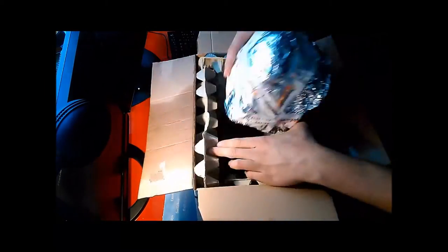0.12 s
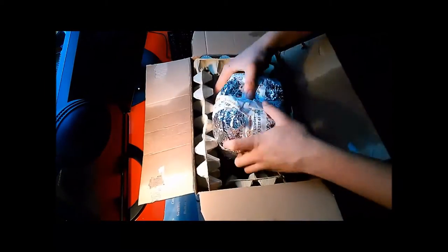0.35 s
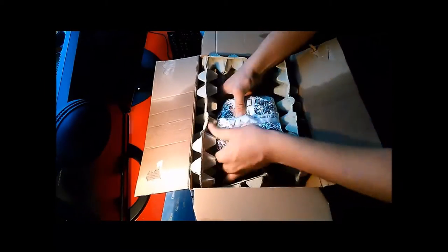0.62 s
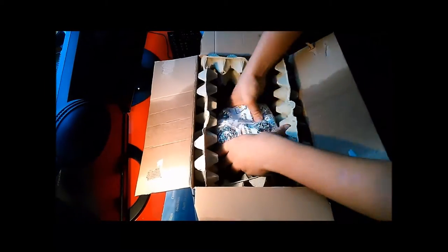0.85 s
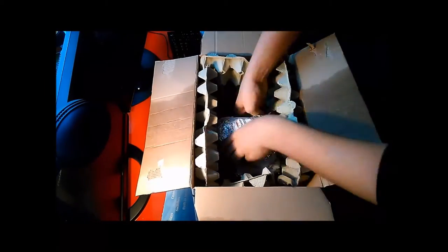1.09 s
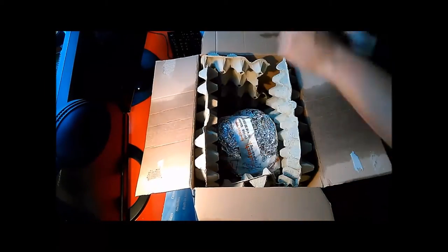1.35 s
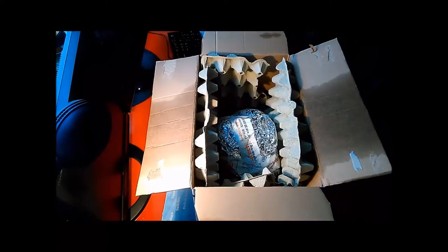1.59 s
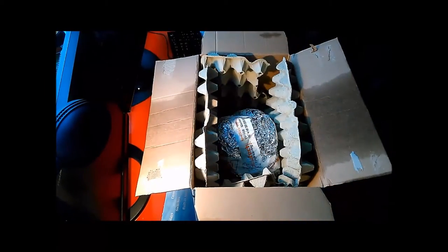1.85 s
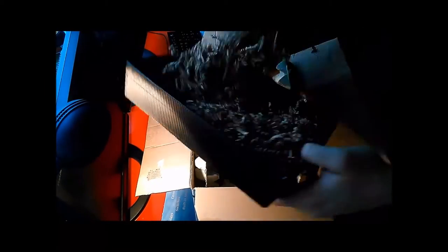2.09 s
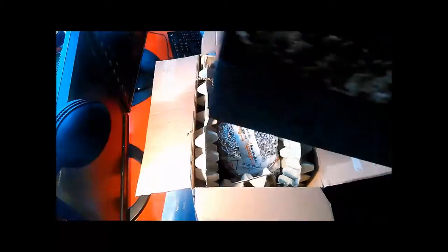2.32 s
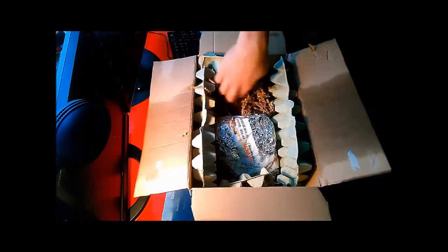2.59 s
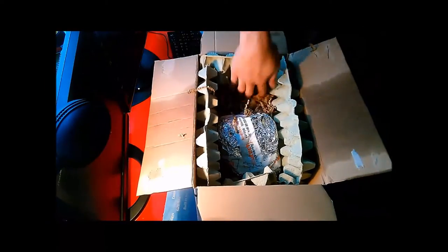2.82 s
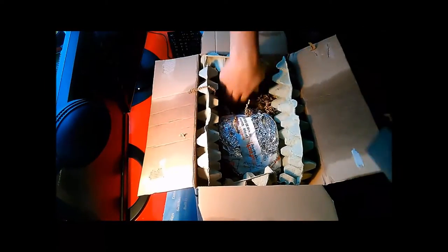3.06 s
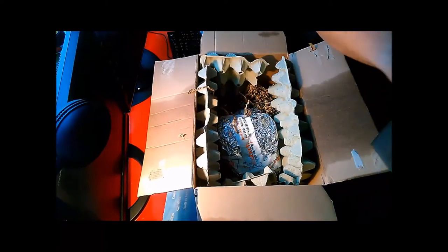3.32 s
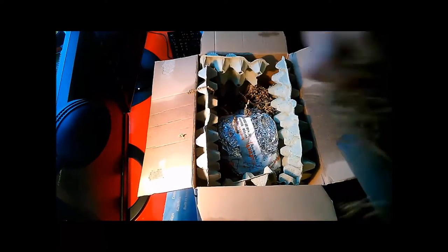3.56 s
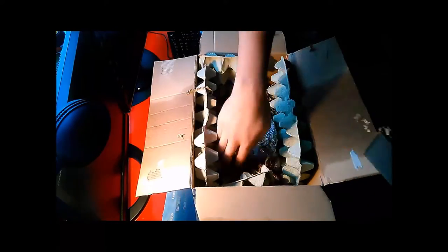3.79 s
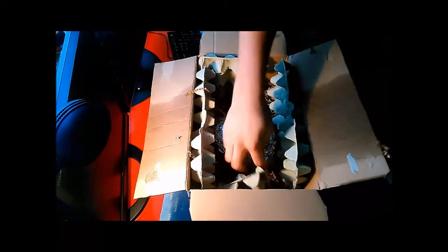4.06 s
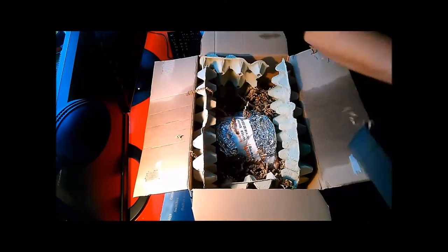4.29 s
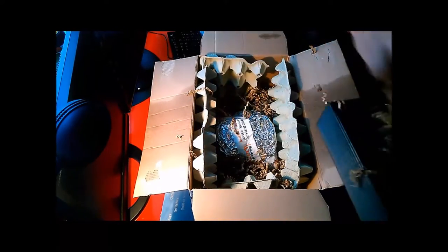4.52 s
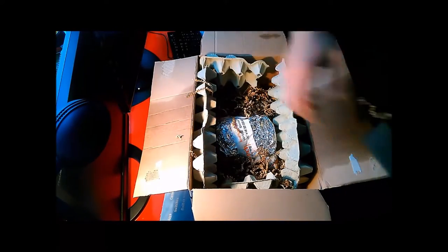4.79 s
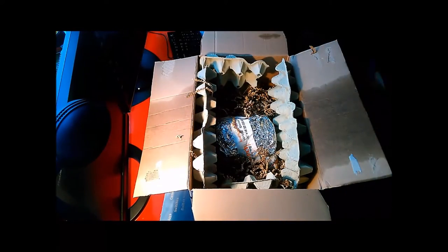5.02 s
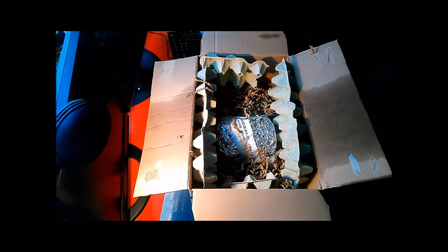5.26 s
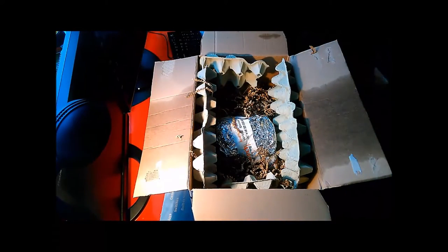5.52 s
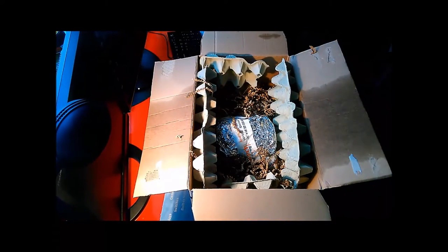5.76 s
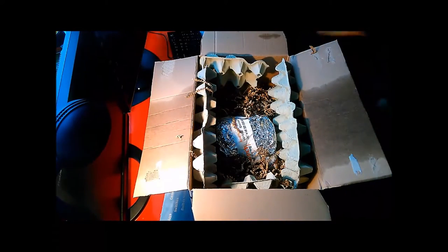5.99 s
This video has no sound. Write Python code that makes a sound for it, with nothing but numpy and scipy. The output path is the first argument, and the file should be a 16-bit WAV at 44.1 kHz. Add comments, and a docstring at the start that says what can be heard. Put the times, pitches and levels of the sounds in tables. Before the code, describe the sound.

Foil-wrapped bundle pressed hard into a cardboard box with crackles, knocks and hollow booms, then softer shredded-paper stuffing and a bright final crumple.

```python
"""Hands press a foil-wrapped bundle into a cardboard box lined with egg trays, in a quiet room.
A tray of shredded paper then slides close, the shreds are stuffed in with short strokes, and at the
end a bright sheet crumples beside the box. Creases are bursts of coloured noise, walls are struck
resonances, and the air in the box booms on low swelling sines. Faint room noise with thin tones
lies below; the right of two close microphones is nearer, so it is louder."""
import sys
import numpy as np
from scipy import signal
from scipy.fft import rfft, irfft
from scipy.io import wavfile
from scipy.ndimage import uniform_filter1d

SR = 44100
rng = np.random.default_rng(int(sys.argv[2]) if len(sys.argv) > 2 else 0)


def store_wav(level_fs):
    """Save 16-bit WAV to argv[1]."""
    pcm = np.round(np.clip(np.atleast_2d(level_fs), -1, 1) * 32767)
    wavfile.write(sys.argv[1], SR, pcm.T.astype(np.int16))


def rack_gain(trim_db):
    """Turn a fader trim in dB into the linear factor to multiply a signal by."""
    fader = np.asarray(trim_db, float)
    return 10 ** (fader / 20)


N = 270333

# Colour of paper crackle. Each row: frequency in Hz, relative level in dB per Hz.
PAPER_COLOUR = [(1200, -18), (2200, -4.5), (3000, -2.5), (4400, -2), (5900, -3.5), (7000, -7.5),
                (8300, -3.5), (10000, 0), (11500, -2), (13500, -2), (15300, -6.5), (16500, -35.5)]


def evened(x):
    """Scales to unit rms."""
    return x / np.sqrt(np.mean(x ** 2) + 1e-20)


def read(points, size):
    """Reads a table over log frequency at the spectrum bins of a signal of this size."""
    hz, value = np.transpose(points)
    bins_hz = np.fft.rfftfreq(size, 1 / SR)
    return np.interp(np.log(bins_hz + 1), np.log(hz + 1), value)


def colour(x, points):
    """Filters by a spectrum table of (Hz, dB)."""
    size = x.shape[-1]
    return irfft(rfft(x) * rack_gain(read(points, size)), size)


def ring(x, modes):
    """Passes x through two-pole resonances (Hz, width Hz, dB) of alternating sign."""
    return sum((-1) ** k * rack_gain(db) * signal.lfilter(*signal.iirpeak(hz, hz / width, SR), x)
               for k, (hz, width, db) in enumerate(modes))


def add(mix, s, sound):
    """Mixes a sound in at a time in seconds."""
    part = mix[:, max(round(s * SR), 0):][:, :sound.shape[-1]]
    part += sound[..., :part.shape[-1]]


def rubbing():
    """One stroke drives paper crackle, its sizzle, the cardboard walls and the air in the box."""
    # Resonances of the cardboard walls. Each row: pitch in Hz, width in Hz, gain in dB.
    wall_modes = [(570, 140, -10), (860, 120, 1.5), (1140, 110, -2), (1370, 150, 0.5), (1605, 130, -0.5),
                  (1980, 430, -6.5), (3120, 190, -6.5)]
    # Resonances of the air in the box. Each row: pitch in Hz, width in Hz, gain in dB.
    air_modes = [(240, 23.4, 8.5), (344, 110, -2.5)]
    fine = creases(per_s=190, spread_db=4.5, fade_s=0.0077, bed=0.95)
    coarse = creases(per_s=120, spread_db=-2.5, fade_s=0.0045, bed=0.52)
    patches = facets(low_hz=668, top_hz=14380, count=18, sharp=7.8)

    paper = colour(0.95 * fine + 0.5 * coarse + 0.72 * patches, PAPER_COLOUR)
    # the thinnest creases speak above this split
    low_pass = signal.butter(N=3, Wn=6770, fs=SR, output="sos")
    crackle = signal.sosfiltfilt(low_pass, paper)
    sizzle = paper - crackle
    walls = ring(coarse + 0.14 * fine + 0.26 * patches, wall_modes)
    # one body of air, the same in both rows
    boom = ring(ring(coarse[0], air_modes), [(258, 700, 0)])
    layers = (crackle, sizzle, walls, boom)
    return sum(level * evened(layer) for level, layer in zip(effort(), layers))


def creases(per_s, spread_db, fade_s, bed):
    """Wide noise that bursts at each crease over a steady bed of rubbing."""
    return evened((bed + gate(per_s, spread_db, fade_s)) * rng.standard_normal((2, N)))


def gate(per_s, spread_db, fade_s):
    """Creases let go at random moments and sizes, each with a sudden start and a short decay."""
    struck = rng.random(N) < per_s / SR
    size = rack_gain(spread_db * np.minimum(rng.exponential(1, N), 3)) * struck
    return evened(signal.lfilter([1], [1, -np.exp(-1 / (fade_s * SR))], size))


def facets(low_hz, top_hz, count, sharp):
    """Flat patches between creases, each flicked at its own moments and ringing at its own pitch."""
    noise = rng.standard_normal((2, N))
    total = 0
    for hz in np.geomspace(low_hz, top_hz, count):
        flicks = gate(per_s=45, spread_db=2.5, fade_s=0.0054) * noise
        width = hz / sharp
        total = total + ring(flicks, [(hz, width, 0)]) / np.sqrt(width)
    return evened(total)


def effort():
    """Levels of crackle, sizzle, wall scrape and boom: the powers of all hand moves add up."""
    # Presses into the box, sudden start and slow sag. Each row: start in seconds, length in seconds,
    # crackle in dB, then sizzle, wall scrape and box boom in dB over crackle.
    press_rows = [(0.128, 0.045, -48, -10, 7, 5.5), (0.196, 0.089, -41, 1, 7.5, 3.5),
                  (0.287, 0.011, -24.5, -8, 0.5, -12), (0.334, 0.15, -35, 0.5, 5, 4.5),
                  (0.45, 0.058, -32, -3.5, 5.5, 7), (0.535, 0.059, -31.5, -2.5, 3.5, -4),
                  (0.616, .021, -41, 1, 12.5, 7), (0.633, 0.059, -27, -4, 7.5, 5),
                  (0.727, 0.069, -35, -1, 6.5, 4), (0.818, 0.13, -33, -2.5, 6.5, 4),
                  (.944, .15, -35.5, -2.5, 6.5, 0), (1.118, 0.04, -29.5, -4.5, 3.5, 4),
                  (1.193, 0.043, -39.5, -7, 4.5, 2.5), (1.396, .02, -39, -18, -6.5, -21),
                  (2.387, 0.048, -42, -2.5, 10.5, 9), (2.453, 0.11, -35, -3.5, 2, -1),
                  (2.596, 0.11, -37.5, 0, 4.5, 0.5), (2.705, 0.1, -35, -3, 1, -3.5),
                  (2.872, 0.075, -33.5, -3, 3, -1.5), (3.019, 0.064, -32.5, -4, -0.5, -5.5),
                  (3.207, 0.061, -42, -1.5, -1.5, -17), (3.77, 0.062, -38, -1, 4.5, -2),
                  (3.85, 0.061, -39, -5.5, 3, 6.5), (3.923, 0.077, -36, -2, 1.5, -1),
                  (4.032, 0.048, -38, -1.5, -1, -5), (4.102, 0.065, -36, -5, 0.5, -0.5),
                  (4.188, 0.029, -39, -2.5, 2.5, -10.5), (4.328, 0.065, -46.5, -2.5, 3, 7.5),
                  (5.002, 0.022, -47, -11, 9.5, -13), (5.042, 0.029, -48, -1, 8, -2)]
    # Loose rustles above the box, swelling and fading evenly. Each row: peak in seconds,
    # half width in seconds, crackle in dB, then sizzle and wall scrape in dB over crackle.
    rustle_rows = [(0.035, 0.018, -46, 12, -13), (.08, 0.014, -52.5, -17, -1), (1.372, 0.029, -62, -3, 2),
                   (1.549, 0.14, -67, -4, -8), (1.761, 0.059, -52.5, 0, -7.5), (3.351, 0.096, -60.5, 4, -7),
                   (3.425, 0.022, -53, 8, -4), (3.5, 0.088, -59, 0, -10), (3.596, 0.02, -50.5, 5.5, -13),
                   (3.693, 0.024, -29, 1, -5), (4.5, 0.13, -60, -2, 3.5), (4.601, 0.069, -54, -4, -12),
                   (4.682, 0.025, -38.5, -1.5, -10), (4.746, 0.024, -43.5, 1, -1),
                   (5.118, 0.03, -55.5, -4, 7), (5.234, 0.061, -49.5, 8.5, 2.5)]
    # The tray of shreds passing. Each row: time in seconds, crackle in dB,
    # then sizzle, wall scrape and box boom in dB over crackle.
    tray_rows = [(1.82, -63, -15, -7, -13), (1.882, -57.5, 3, -6, -28), (2.01, -57.5, 5.5, -12.5, 1),
                 (2.028, -52.5, -2.5, -6, -18), (2.158, -37.5, -1.5, -3.5, -25),
                 (2.182, -34, -4.5, -3, -12.5), (2.35, -42.5, -0.5, 0, -11), (2.38, -54.5, -10, -10, -10)]
    # The sheet crumpling, with the same columns as the tray.
    sheet_rows = [(5.3, -57, 9, -10, 11.5), (5.332, -46.5, 0, -15, -26), (5.372, -39, -1, -8, -4),
                  (5.394, -38, -1, -24, -21), (5.524, -39.5, 3, -6, -15), (5.648, -21.5, 4, -5, -11),
                  (5.672, -29.5, 4.5, -8, -8.5), (5.708, -27.5, 1.5, -3, -20), (5.764, -34.5, 2.5, -5, -5),
                  (5.804, -21, 5.5, -7.5, -28), (5.834, -28, 4, -10.5, -18), (5.93, -22.5, 3.5, -13, -26),
                  (5.982, -30.5, 1, -27, -28), (6.0, -24, 3, -16, -35), (6.098, -39, 4.5, -5, -17),
                  (6.13, -28, 5, 1, -26)]
    # Faint handling throughout. One row: crackle in dB, then sizzle, wall and boom in dB over crackle.
    fidget_row = (-71, -0.5, 3.5, 2.5)
    attack_s, sag_db_per_s, release_db_per_s = 0.0062, 42, 519

    t = np.arange(0, N + 64, 32) / SR  # one level every 32 samples
    moves = [(fidget_row[0] + 0 * t, *fidget_row[1:])]
    for s, length, db, *over_db in press_rows:
        since = np.maximum(t - s, 0)
        rise_db = 20 * np.log10(np.clip(since / attack_s, 1e-6, 1))
        fall_db = sag_db_per_s * since + release_db_per_s * np.maximum(since - length, 0)
        moves.append((db + rise_db - fall_db, *over_db))

    for s, half, db, sizzle_db, wall_db in rustle_rows:
        swell_db = -12.5 * ((t - s) / half) ** 2  # 12.5 dB down at one half width
        boom_db = wall_db - 13
        moves.append((db + swell_db, sizzle_db, wall_db, boom_db))

    for move in (tray_rows, sheet_rows):
        s, *columns = np.transpose(move)
        db, *over_db = (np.interp(t, s, column) for column in columns)
        outside = np.maximum(np.maximum(s[0] - t, t - s[-1]), 0)
        moves.append((db - release_db_per_s * outside, *over_db))

    power = sum(rack_gain(np.array([db, db + sizzle, db + wall, db + boom])) ** 2
                for db, sizzle, wall, boom in moves)
    return [np.interp(np.arange(N) / SR, t, np.sqrt(p)) for p in power]


def snaps():
    """Each snap is a dying noise burst that crackles and knocks a resonant wall."""
    # Snaps and knocks. Each row: time in seconds, knock peak in dB, knock pitch in Hz,
    # crackle peak in dB over knock peak, burst decay to -60 dB in seconds.
    snap_rows = [(.135, -23.5, 767, -2.5, 0.13), (.197, -16.5, 890, -16, 0.034),
                 (.298, -8.5, 1570, -24, 0.06), (.347, -19.5, 1140, 2, 0.057),
                 (.384, -16.5, 1130, -14, 0.15), (.428, -10, 1400, -12, 0.078), (0.466, -11, 1600, 8, .055),
                 (.503, -18.5, 1190, -26, 0.042), (0.562, -7, 1260, -4, 0.02), (.586, -10, 1480, -29, .05),
                 (.644, -1, 1268, -32, 0.032), (.672, -3, 1220, -7, 0.037), (.753, 1, 877, -29, 0.043),
                 (0.903, -14, 1480, 5, 0.075), (0.967, -15, 1260, -29, 0.2), (1.128, -5, 1266, -29, 0.018),
                 (1.195, -5.5, 1280, 4.5, 0.028), (1.227, -23, 1980, 18, 0.049),
                 (1.332, -43, 1410, -2, .04), (1.368, -41.5, 2800, 2, 0.062),
                 (1.414, -22, 1424, -25, 0.032), (1.727, -40, 800, 5, .046), (2.016, -37, 2480, 9, 0.064),
                 (2.096, -26.5, 2390, 5, .1), (2.395, -23, 2840, -24, 0.048), (2.416, -26, 1140, 9.5, 0.12),
                 (2.481, -12, 1340, -2.5, .026), (2.512, -16, 1310, -18, 0.062),
                 (2.56, -19.5, 775, -14, 0.038), (2.604, -23.5, 1300, -12, 0.14),
                 (2.672, -21, 1230, -17, 0.087), (2.879, -46, 910, 9.5, .07), (3.028, -26, 860, -23, .07),
                 (3.205, -35, 796, 6.5, .08), (3.225, -32, 3540, 0, 0.065), (3.427, -32.5, 2280, 3, 0.05),
                 (3.622, -39, 1840, 14, .1), (3.654, -39, 1510, 19, .035), (3.685, -22, 1430, 2, 0.16),
                 (3.782, -16.5, 1320, 0.5, 0.075), (3.856, -19.5, 1270, -6, .08),
                 (3.887, -19, 1400, -3, .055), (4.045, -25.5, 1370, -1, 0.12),
                 (4.108, -24.5, 904, -17, 0.045), (4.138, -18, 920, -4.5, 0.18),
                 (4.342, -25.5, 2450, -5, 0.085), (4.359, -23, 1250, -12, 0.039),
                 (4.452, -45, 790, -14, .04), (4.556, -38, 3030, -10, 0.034), (4.613, -33, 3370, 1, 0.043),
                 (4.662, -35, 1330, 5, .06), (4.676, -26, 3000, -4, .04), (4.687, -30.5, 1390, -6, .05),
                 (4.732, -37, 1540, -13, .047), (5.01, -33, 860, -23, .04), (5.021, -26.5, 2460, -6, .04),
                 (5.056, -28.5, 3700, -2, .08), (5.103, -35.5, 837, -24, .035), (5.253, -26, 5340, -5, .04),
                 (5.545, -35.5, 3000, 25.5, 0.057), (5.596, -13.5, 5260, -20, .057),
                 (5.64, -21, 4140, -4, .035), (5.79, -21, 4460, 7, .05)]
    out = np.zeros((2, N))
    t = np.arange(round(.15 * SR)) / SR
    for s, db, hz, crackle_db, t60 in snap_rows:
        # the fold breaks at once, then smaller folds settle after it
        fall = rack_gain(-60 * t / max(t60, .008)) + 1.7 * np.exp(-t / 0.001)
        burst = (1 - np.exp(-t / 0.00028)) * fall * rng.standard_normal((2, len(t)))

        overtones_hz = np.minimum(hz * rng.uniform(1.3, 3.27, size=3), 12000)
        modes = [(hz, 0.21 * hz, 0)] + [(f, 0.22 * hz, -8) for f in overtones_hz]
        knock = ring(burst[0] + 1.3 * burst, modes)
        knock += 0.18 * ring(burst, [(2 * hz, 1.8 * hz, 0)])
        # the struck panel also rings clean at its own pitch for a few cycles
        panel = np.exp(-t * hz / 5.5) * (1 - np.exp(-t * hz * 2.6)) * np.sin(2 * np.pi * hz * t)
        knock += 0.45 * abs(knock).max() * panel

        crackle = colour(burst, PAPER_COLOUR)
        snap = knock / abs(knock).max() + rack_gain(crackle_db) * crackle / abs(crackle).max()
        add(out, s - .001, rack_gain(db) * snap)
    return out


def booms():
    """Squeezed air in the box takes a few cycles to swell, then dies; a weaker upper note rides along."""
    # Pushes on the air. Each row: time in seconds (6 ms into the swell), swell peak in dB, pitch in Hz.
    boom_rows = [(0.201, -27, 220.4), (0.3, -20, 232), (0.358, -14, 240), (0.432, -22, 232.5),
                 (0.467, -17, 260.5), (0.568, -18.5, 228.5), (0.588, -14, 229), (0.647, -13.5, 248),
                 (0.679, -10, 244.3), (0.76, -14.5, 241), (0.976, -19, 239.6), (1.142, -15, 245.3),
                 (1.199, -20.5, 236), (1.704, -47.5, 254), (2.397, -28, 346), (2.462, -26, 344),
                 (2.516, -29, 227), (3.026, -32.5, 236), (3.796, -27.5, 229), (3.868, -24, 244),
                 (5.613, -35, 247)]
    out = np.zeros((2, N))
    t = np.arange(round(.2 * SR)) / SR
    for s, db, hz in boom_rows:
        swell = (1 - np.exp(-t / 0.007)) ** 2 * rack_gain(-60 * t / 0.076)  # 76 ms decay to -60 dB
        low_note = np.sin(2 * np.pi * hz * t)
        upper_note = 0.14 * np.sin(2 * np.pi * (1.55 * hz * t + rng.random()))
        add(out, s - .006, rack_gain(db) * swell / swell.max() * (low_note + upper_note))
    return out


def swish():
    """Fluttering noise in one narrow band whose pitch slides as the tray of shreds comes close."""
    # Path of the slide. Each row: time in seconds, level in dB, pitch in Hz.
    slide_rows = [(1.861, -64, 1950), (2.04, -54, 2150), (2.15, -33, 2426), (2.24, -43, 2470)]
    s, db, hz = np.transpose(slide_rows)
    t = np.arange(s[0], s[-1], 1 / SR)
    flutter = ring(rng.standard_normal((4, len(t))), [(60, 160, 0)])
    phase = 2 * np.pi * np.cumsum(np.interp(t, s, hz)) / SR
    band = flutter[:2] * np.cos(phase) + flutter[2:] * np.sin(phase)
    out = np.zeros((2, N))
    add(out, s[0], rack_gain(np.interp(t, s, db)) * evened(band))
    return out


def echoes(x, t60=0.051):
    """Sparse decaying taps of random sign, from the table and near walls."""
    t = np.arange(round(.2 * SR)) / SR
    signs = np.sign(rng.standard_normal((2, len(t))))
    present = rng.random((2, len(t))) < .05
    taps = signs * present * rack_gain(-60 * t / t60) * (t > .003)
    return signal.fftconvolve(x, taps / np.linalg.norm(taps[0]), axes=1)[:, :N]


def room_tone():
    """Faint coloured noise of the room, swaying a little in level, with a few thin tones."""
    # Colour of the room noise. Each row: frequency in Hz, relative level in dB per Hz.
    room_colour = [(30, -26), (100, -22.5), (150, -6.5), (280, -4), (650, -18), (1200, -17.5), (3000, -18),
                   (5000, -28.5), (13000, -39), (16400, -49)]
    # Thin tones. Each row: pitch in Hz, level in dB before the fade.
    whine_rows = [(1104, -66), (2826, -63), (3182, -65)]
    # Fade of the tones. Each row: time in seconds, gain in dB.
    fade_rows = [(0, 0), (2.0, -3.5), (2.4, -11), (6.13, -14)]
    t = np.arange(N) / SR
    sway_db = 0.47 * evened(uniform_filter1d(rng.standard_normal(N), 3000))
    tones = sum(rack_gain(db) * np.sin(2 * np.pi * (hz * t + rng.random())) for hz, db in whine_rows)
    fade_db = np.interp(t, *np.transpose(fade_rows))
    noise = rack_gain(-57.5 + sway_db) * evened(colour(rng.standard_normal((2, N)), room_colour))
    return noise + tones * rack_gain(fade_db + 1.1 * sway_db)


def microphones(x):
    """Blends the two rows so that channel likeness and balance vary with frequency."""
    # Likeness of the channels. Each row: frequency in Hz, left-right correlation from -1 to 1.
    likeness = [(110, -0.77), (200, 1), (380, 0.27), (700, 0.84), (1290, 0.54), (2380, 0.27), (4400, 0.41),
                (7000, -0.27), (10000, 0.056), (15000, 0.9)]
    # Balance of the channels. Each row: frequency in Hz, left over right in dB.
    balance = [(60, -6.5), (150, -9), (380, -8.5), (950, -3.5), (2380, -4), (5980, -5), (15000, -6)]
    near, other = rfft(x)
    same = np.clip(read(likeness, N), -1, 1)
    lean = rack_gain(read(balance, N) / 2)  # half the difference goes to each side
    left = same * near + np.sqrt(1 - same ** 2) * other
    return irfft(np.array([left * lean, near / lean]), N)


def scene():
    """Packing sounds with their echoes, over the room tone, at the two microphones."""
    hands = rubbing() + snaps() + booms() + swish()
    return microphones(hands + rack_gain(-12.0) * echoes(hands) + room_tone())


def rumble(x):
    """Deep noise, independent in the two channels, that follows the level of the sound's lower part."""
    lower = uniform_filter1d(x, size=8, axis=1)
    level = np.sqrt(abs(uniform_filter1d(lower ** 2, size=600, axis=1)))
    deep = colour(rng.standard_normal(x.shape), [(20, 4.0), (90, 4), (150, 5.5), (400, -54.5)])
    return rack_gain(-31.0) * level * evened(deep)


def roll_off(x):
    """The treble ends steeply here."""
    return signal.sosfilt(signal.butter(12, 16520, fs=SR, output="sos"), x)


def record(dry):
    """Rolls off the bass, adds the rumble, limits the band and clips at full scale."""
    high_pass = signal.butter(N=3, Wn=140, btype="high", fs=SR, output="sos")
    x = signal.sosfilt(high_pass, dry)
    band_limit = signal.firwin(numtaps=255, cutoff=15900, window=("kaiser", 8), fs=SR)
    x = signal.oaconvolve(x + rumble(x), band_limit[None], "same")
    mix = np.clip(x, -1, 1)
    return roll_off(mix)


dry = scene()
out = record(dry)
store_wav(out)
```